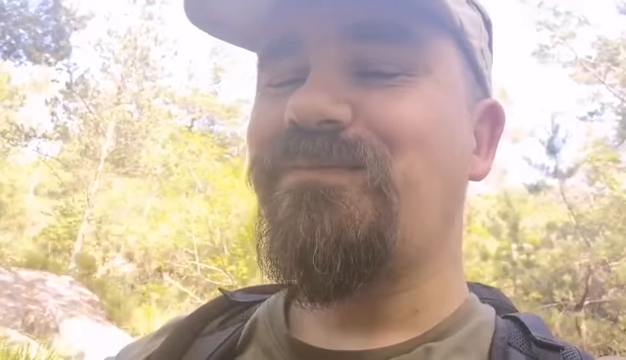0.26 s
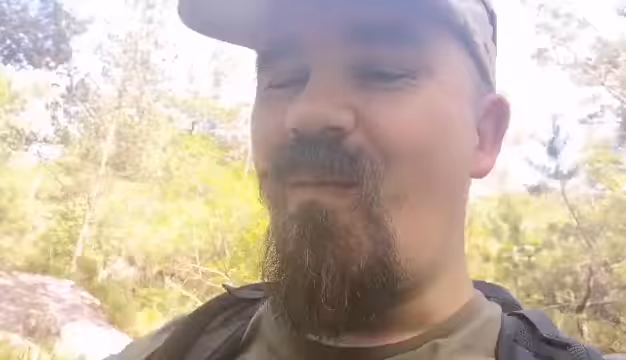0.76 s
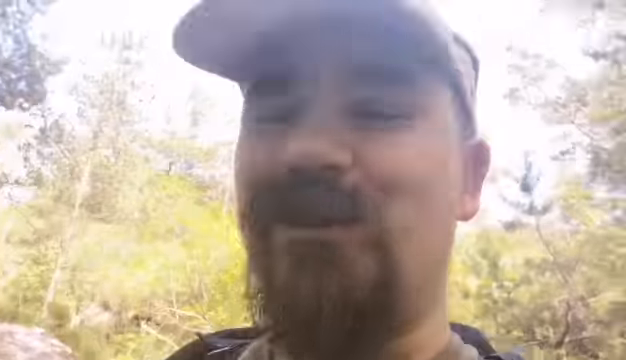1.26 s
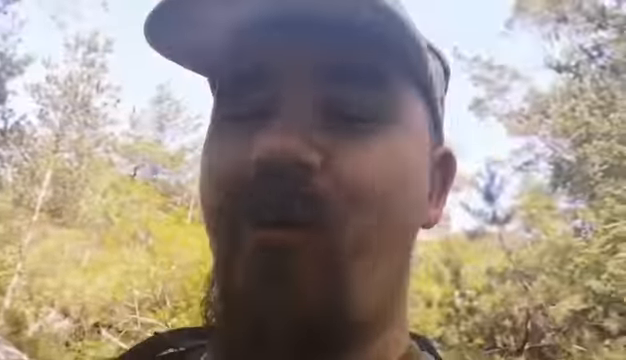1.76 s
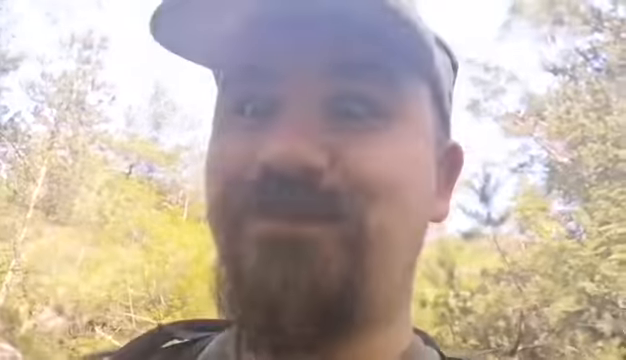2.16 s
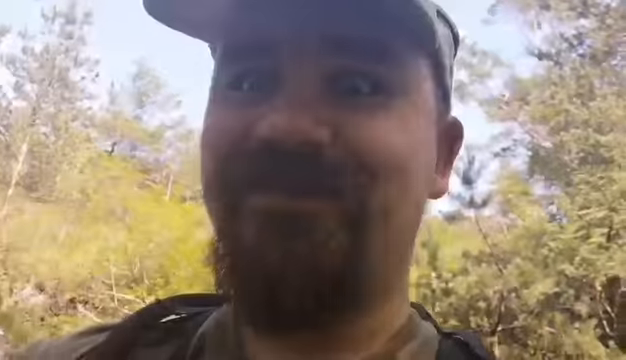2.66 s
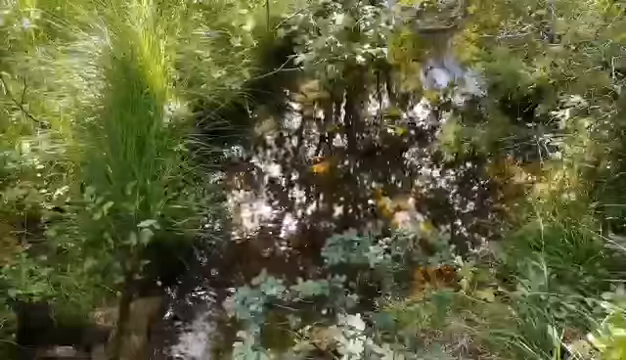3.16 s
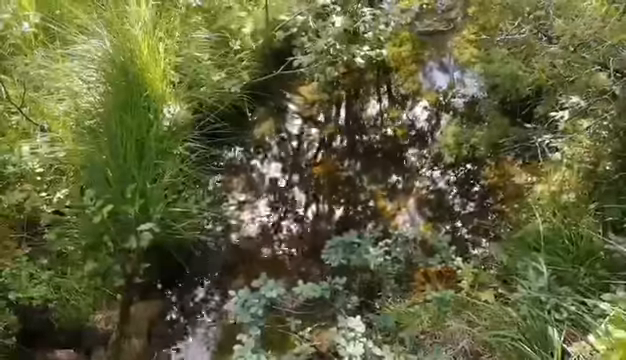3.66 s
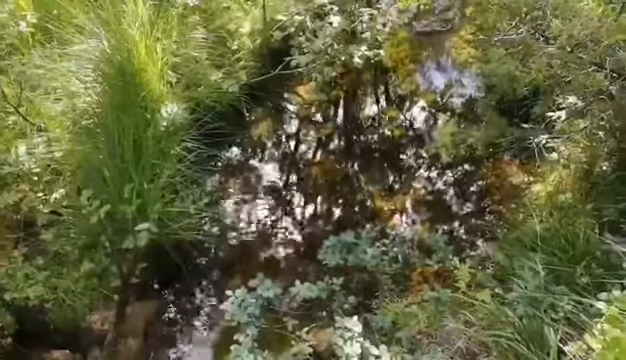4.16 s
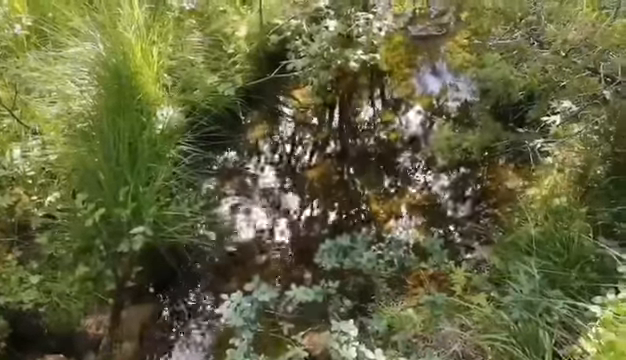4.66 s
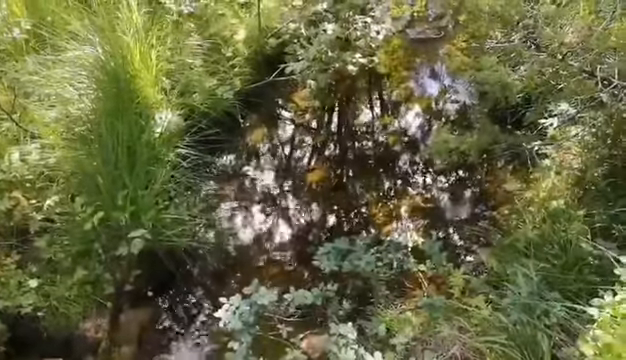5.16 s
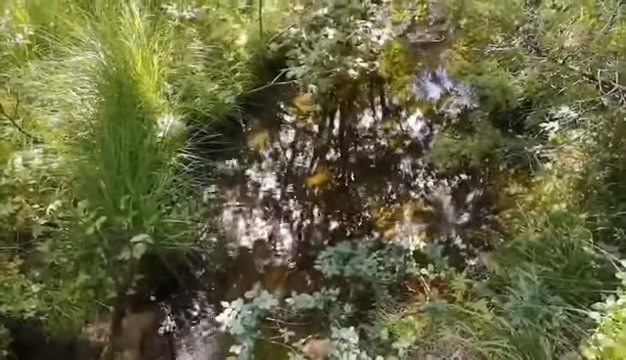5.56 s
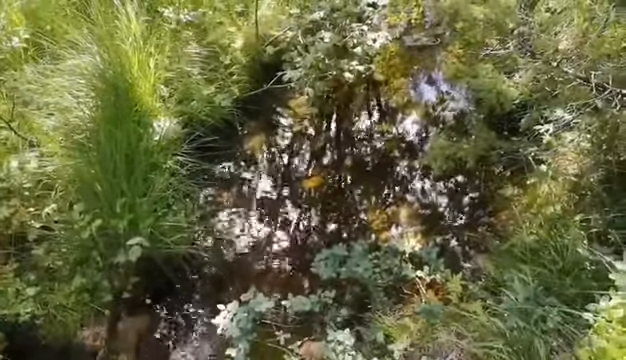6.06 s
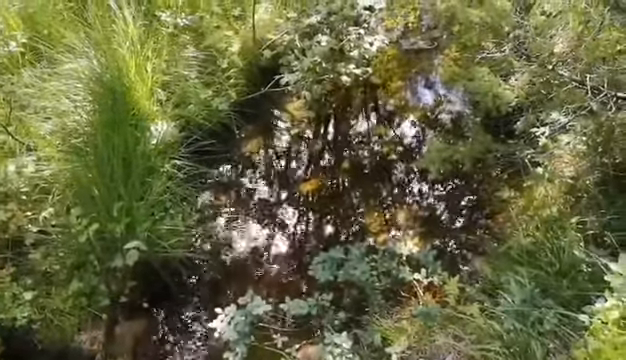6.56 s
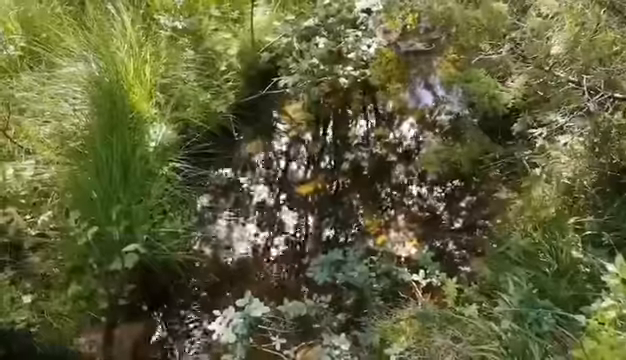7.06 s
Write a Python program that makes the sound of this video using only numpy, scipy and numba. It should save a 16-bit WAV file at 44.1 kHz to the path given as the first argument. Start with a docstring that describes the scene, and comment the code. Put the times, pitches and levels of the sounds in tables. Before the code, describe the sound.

A small brook gurgles over stones from the start, heard outdoors from a hand-held phone a few steps away. The water is a dense, steady bubbling with distinct little plops, light splashes and a fine hiss, over a faint low wind rumble. At about 1.6 seconds the water grows louder and shifts to the left. Between 1.7 and 2.3 seconds, fingers make several dull thumps on the phone and light gusts rumble on the microphone; one more soft thump comes just after 3 seconds. At 3.2 seconds everything cuts to silence. At 3.6 seconds the brook returns quietly and swells over about a second, now brighter and more to the right. It keeps gurgling, with scattered plops and small splashes, until the end at about 7.3 seconds.

```python
"""A brook gurgles over stones, a few steps from a hand-held phone. Water traps air bubbles that ring as
damped resonators, the smaller the higher; hollows under the stones glug. The hand turns, thumping the
case and bringing one microphone round to the water. The sound cuts out briefly, then fades in again
facing the brook. Light, gusty wind rumbles on the microphone ports over a low murmur."""
import sys
import numpy as np
from scipy import signal
from scipy.fft import rfft, irfft, next_fast_len
from scipy.io import wavfile
from scipy.ndimage import uniform_filter1d
from numba import njit

SR = 44100
rng = np.random.default_rng(int(sys.argv[2]) if len(sys.argv) > 2 else 0)


def bounce(signal):
    """Save signal as a 16-bit WAV file at the path given by the first command-line argument."""
    frames = np.transpose(np.atleast_2d(signal))
    limited = np.clip(frames, -1, 1)
    pcm = np.round(limited * 32767).astype(np.int16)
    wavfile.write(sys.argv[1], SR, pcm)


N = 322371

# audible spans on either side of the silent gap: (start [s], end [s])
SPANS = [(0, 3.194), (3.622, 7.31)]
# arrival delay at the left port: (before the gap [s], after the gap [s])
LEFT_LAG_S = [.00001, -0.000059]
GAP_START_S, GAP_END_S = SPANS[0][1], SPANS[1][0]
TIME = np.arange(N) / SR


def brook():
    """Superposition: three bubble populations share the same splashes; single bursts stand out."""
    # bubble spectra, large and small before and after the gap: (frequency [Hz], relative density [dB])
    large_spectra = [
        [(260, -45), (450, -35.5), (566, -17), (673, -28.5), (765, -16.5), (979, -8), (1160, -10), (1410, -4.5),
         (2000, 1), (4000, -11), (5200, -48.5)],
        [(260, -55), (450, -34.5), (555, -15), (667, -26), (997, -6.5), (1400, -1), (2150, -0.5), (2420, -0.5),
         (2800, -2), (4000, -10.5), (5200, -20.5), (8800, -120)],
    ]
    small_spectra = [
        [(2060, -18.5), (3500, -12), (4660, 7), (5800, 1.5), (6390, -16.5), (8000, -50.5), (10400, -63.5)],
        [(2060, -35), (3500, -15.5), (4380, -11.5), (5840, -2), (6660, -11), (8000, -25), (10400, -53.5)],
    ]
    spray_spectrum = [(4410, -3), (7500, -4), (8420, -9.5), (10700, -4), (13100, -11.5), (14500, -12),
                      (15500, -26)]
    # swell and sag of the flow: (time [s], large-bubble gain [dB], small-bubble gain [dB])
    surge = [(0, -3, -2), (1.0, -4.5, -5), (1.7, -1.5, -1.5), (2.0, 2, -6), (2.46, 0, -5), (2.65, 3.5, 2),
             (3.01, -1.5, -2.5), (3.08, 3, 1), (3.19, -1.5, -3), (4.84, -1.65, 0.5), (4.95, 1.5, 4),
             (5.1, -3.5, -5), (5.2, 1.5, 0), (5.34, -2, -0.5), (5.61, 1, -1.5), (6.1, -1, -1.4),
             (6.96, -2.5, -4), (7.31, 0, -3)]
    (large_db, small_db, spray_db, _, _), pans_db = orientation()
    times, large_surge, small_surge = np.transpose(surge)
    large_db = large_db + np.interp(TIME, times, large_surge) + fade_db()
    small_db = small_db + np.interp(TIME, times, small_surge) + fade_db()
    spray_db = spray_db + 0.99 * fade_db()
    splash = splashes(large_db)
    large = [bubbles(spectrum, splash, count=10000, cycles=42.2, scatter_db=11, stray=.35, trail_s=.009,
                     wide_db=5, wide_s=3e-5, far_db=-.5, steady=1.3, sharp=.15, alike_hz=2400,
                     rise=.077, glide=.11) for spectrum in large_spectra]
    small = [bubbles(spectrum, splash, count=8000, cycles=87, scatter_db=14.5, stray=.37, trail_s=.0092,
                     wide_db=3.5, wide_s=6e-5, far_db=-2.5, steady=1.2, sharp=.5, alike_hz=1500,
                     rise=.055, glide=.08) for spectrum in small_spectra]
    spray = bubbles(spray_spectrum, splash, count=10000, cycles=79, scatter_db=9.5, stray=.45,
                    trail_s=.0051, wide_db=.5, wide_s=1e-4, far_db=.5, steady=4, sharp=.7,
                    alike_hz=1500, rise=.07, glide=.06)
    before = TIME < GAP_START_S
    finest = signal.lfilter(*signal.butter(2, 11660, "high", fs=SR), spray)
    spray = spray + ~before * (undb(3) - 1) * finest  # brighter when facing the brook
    layers = np.where(before, *large), np.where(before, *small), spray
    levels_db = large_db, small_db, spray_db
    flow = sum(undb(db) * case_shadow(x, pan) for x, db, pan in zip(layers, levels_db, pans_db))
    return flow + plops(pans_db[0]) + glugs() + droplets()


def bubbles(spectrum, splash, count, cycles, scatter_db, stray, trail_s, wide_db, wide_s,
            far_db, steady, sharp, alike_hz, rise, glide, clump_db=3.5, clump_octaves=2.196):
    """Bubble resonance: most trail a splash, a share strays in between; far ones blur into hiss."""
    moment, pitch, pick, shallowness, kind, wait, strength = rng.random((count, 7)).T
    pan, bearing = rng.standard_normal((count, 2)).T
    splash_s, splash_db, wash, crack = splash
    parent = (pick * len(splash_s)).astype(int)
    trailing = kind > stray
    times = np.where(trailing, splash_s[parent] - trail_s * np.log(wait), moment * N / SR)
    hz = spectrum[0][0] * (spectrum[-1][0] / spectrum[0][0]) ** pitch
    # even spacing per octave and shorter high rings thin the energy per Hz as 1 / Hz^2: lift it back
    db = shape_db(spectrum, hz) + 20 * np.log10(hz) + scatter_db * strength
    favourite = rng.random(len(splash_s))[parent]  # each splash favours its own bubble sizes
    clump = np.cos(2 * np.pi * (np.log2(hz) / clump_octaves + favourite))
    db = db + trailing * (splash_db[parent] + clump_db * clump)
    lag = wide_s * bearing + np.where(times < GAP_START_S, *LEFT_LAG_S)
    # shallower bubbles ring more briefly and rise more in pitch
    t60 = cycles * 0.12 ** shallowness / hz
    near = tones(times, hz, t60, db, wide_db * pan, rise, glide * shallowness, lag)
    far = hiss(spectrum, alike_hz, flicker_db=2.7, rate_hz=12) * (steady + wash + sharp * crack)
    return unit(unit(near) + undb(far_db) * unit(far))


def splashes(flow_db, count=340, spread_db=1.98, strong_db=-16.5, wash_s=0.021, crack_s=0.0034):
    """Impulsive excitation: each slap of water starts a slow wash and a short crack envelope."""
    # strongest slaps over a stone: (time [s], level [dB]), taken relative to the running flow
    slaps = [(0.1244, -30), (1.645, -33.5), (1.6772, -36.5), (1.7952, -36), (1.96, -37), (2.3579, -30.5),
             (2.39, -30.5), (2.4363, -36), (2.5343, -30.5), (2.595, -21.5), (2.7307, -30.5),
             (2.8126, -28.5), (2.8612, -28), (2.898, -36), (3.084, -30.5), (3.1268, -29.5), (3.626, -50),
             (4.1053, -31), (4.31, -33), (4.4295, -32.5), (4.6197, -33), (4.8242, -22), (5.227, -32.5),
             (5.3881, -28), (5.5032, -23), (5.66, -36), (6.037, -31.5), (6.0856, -30), (6.12, -30),
             (6.2051, -25.5), (6.5558, -38), (6.733, -28), (6.83, -21.5), (6.9272, -36.5), (7.1241, -35),
             (7.2714, -26.5)]
    weak_s = (np.arange(count) + rng.random(count)) / count * N / SR
    weak_db = spread_db * rng.standard_normal(count)
    slap_s, slap_db = np.transpose(slaps)
    slap_db = slap_db - flow_db[(slap_s * SR).astype(int)] + strong_db
    times, db = np.r_[weak_s, slap_s], np.r_[weak_db, slap_db]
    kicks = np.bincount((times * SR).astype(int), undb(db), N)
    wash, crack = (unit(signal.lfilter([1], [1, -np.exp(-1 / (tau * SR))], kicks))
                   for tau in (wash_s, crack_s))
    return times, db, wash, crack


def plops(pan_db, follow_s=0.005, follow_db=-6.5):
    """Beating: a loud bubble opens with a click, then rings against a follower of nearby pitch."""
    # loudest single bubbles: (time [s], peak level [dB], pitch [Hz])
    bursts = [(0.065, -41, 2340), (0.134, -41, 2250), (0.174, -39.5, 2970), (0.233, -43, 3030),
              (0.307, -42, 2900), (0.378, -42, 3330), (0.398, -38.5, 2710), (0.784, -40, 2430),
              (0.959, -42.5, 1870), (0.967, -43, 767), (0.989, -33, 2420), (1.106, -46.5, 1370),
              (1.158, -41.5, 1490), (1.428, -48, 1060), (1.652, -40, 1580), (1.781, -47, 1020),
              (1.795, -36, 1880), (1.957, -33.5, 1980), (1.983, -36, 1970), (2.005, -41, 2000),
              (2.028, -35, 2050), (2.046, -35.5, 1630), (2.124, -45.5, 920), (2.127, -37, 1960),
              (2.138, -38.5, 4800), (2.274, -44, 4860), (2.346, -44, 3600), (2.359, -35, 2100),
              (2.363, -37, 1445), (2.393, -34, 2000), (2.437, -34, 4400), (2.52, -39.5, 4500),
              (2.534, -41, 1040), (2.571, -45, 1100), (2.593, -41.5, 966), (2.603, -40, 1010),
              (2.623, -40.5, 1000), (2.827, -44.5, 5640), (2.901, -32, 2430), (3.061, -37.5, 4840),
              (3.086, -35, 1920), (3.132, -39, 2200), (3.148, -37.5, 2330), (4.011, -43, 1830),
              (4.106, -40.5, 1860), (4.108, -39, 3560), (4.196, -40, 2790), (4.196, -44, 1255),
              (4.214, -49.5, 1145), (4.27, -47, 1980), (4.28, -37.5, 5660), (4.311, -38.5, 2000),
              (4.334, -38, 2010), (4.347, -43, 1340), (4.358, -40, 2980), (4.385, -40.5, 5700),
              (4.429, -39, 2650), (4.443, -41, 1410), (4.464, -39.5, 2010), (4.558, -49.5, 987),
              (4.567, -34.5, 2670), (4.618, -39.5, 2790), (4.769, -47.5, 996), (4.822, -36.5, 2090),
              (4.855, -39.5, 1530), (4.897, -40, 2080), (4.907, -41, 1460), (5.023, -40, 1420),
              (5.026, -41.5, 3750), (5.207, -46, 1080), (5.227, -32.5, 2760), (5.283, -41, 2820),
              (5.332, -45, 1360), (5.347, -39, 3570), (5.388, -38, 2200), (5.532, -38, 1820),
              (5.541, -39.5, 1250), (5.612, -48, 990), (5.661, -48, 995), (5.69, -33.5, 5650),
              (5.848, -39, 3180), (5.867, -37.5, 2940), (5.976, -41, 1210), (6.034, -39, 3280),
              (6.035, -35.5, 1466), (6.086, -36.5, 2100), (6.117, -38, 1400), (6.124, -29.5, 1430),
              (6.208, -40, 2600), (6.456, -35.5, 2180), (6.522, -37.5, 1800), (6.547, -46.5, 975),
              (6.555, -34.5, 3450), (6.604, -46.5, 933), (6.748, -42.5, 1255), (6.836, -35.5, 2220),
              (6.841, -46, 1760), (6.862, -45.5, 1005), (6.926, -43, 1240), (6.978, -40.5, 1370),
              (7.03, -36, 2480), (7.124, -39, 1820), (7.137, -39, 1810)]
    times, db, hz = np.transpose(bursts)[:, :, None]
    wait, strength, detune = rng.standard_normal((len(bursts), 2, 3)).transpose(2, 0, 1)
    follower = np.array([0, 1])
    times = (times + follower * follow_s * np.exp(0.44 * wait)).ravel()
    db = (db + follower * (follow_db + 1.8 * strength)).ravel()
    hz = (hz * np.exp(follower * (0.033 + 0.085 * detune))).ravel()
    t60 = 0.032 * (hz / 1000) ** -1.37  # smaller, higher bubbles die faster
    pan_db = pan_db[(times * SR).astype(int)] * np.minimum(hz / 1500, 1.6)  # the case shades highs more
    lag = np.where(times < GAP_START_S, *LEFT_LAG_S)
    clicks = tones(times[::2], 1.59 * hz[::2], 0.0013, db[::2] - 8.5, pan_db[::2],
                   rise=0.045, glide=0, lag=lag[::2])
    return clicks + tones(times, hz, t60, db, pan_db, rise=0.083, glide=0.033, lag=lag)


def glugs(count=200, t60=0.043, scatter_db=4.5):
    """Cavity resonance: air caught in hollows lets go in soft rising notes at random moments."""
    # hollows under the stones: (pitch [Hz], pitch spread [log ratio], typical peak level [dB])
    hollows = [(553, .07, -69), (798.5, .13, -65.5)]
    times = rng.random(count) * N / SR
    strength, detune, pan = rng.standard_normal((count, 3)).T
    hz, spread, db = np.array(hollows)[np.arange(count) % len(hollows)].T
    db = db + scatter_db * strength + fade_db()[(times * SR).astype(int)]
    return tones(times, hz * np.exp(spread * detune), t60, db, 3 * pan, rise=0.25, glide=0.11)


def droplets(t60=0.0018):
    """Heavy damping: a droplet's high ring dies so fast that it is heard as a tick."""
    # droplet ticks: (time [s], peak level [dB], pitch [Hz], left minus right [dB])
    ticks = [(0.123, -54, 10700, 14.0), (1.168, -45, 11400, 24), (2.136, -50, 7240, 10.5),
             (2.6286, -48, 10300, 17), (5.225, -49, 13400, -15.0), (5.9463, -51, 12700, -17)]
    times, db, hz, pan_db = np.transpose(ticks)
    return tones(times, hz, t60, db, pan_db, rise=0.1, glide=0.032)


def banks(x, wet_db=-7.5, t60=0.02, size=4096):
    """Diffuse scattering: stones, banks and moving water return the sound by ever-changing paths."""
    t = np.arange(size // 2) / SR
    wet = np.zeros((2, N + 3 * size))
    padded = np.pad(x, ((0, 0), (size, size)))
    window = np.sqrt(np.hanning(size))
    for i in range(0, N + size, size // 2):
        tail = rng.standard_normal((2, len(t))) * 1000 ** (-t / t60) * (t > .0015)
        tail = tail / np.sqrt(np.sum(tail ** 2, axis=1, keepdims=True))
        piece = padded[:, i:i + size]
        echo = signal.fftconvolve(piece * window[:piece.shape[1]], tail, axes=1)
        wet[:, i:i + echo.shape[1]] += echo
    return x + undb(wet_db) * wet[:, size:size + N]


def fingers():
    """Structure-borne sound: shifting fingers send dull thumps through the case."""
    # thumps: (time [s], peak level [dB], pitch [Hz], t60 [s], left minus right [dB])
    thumps = [(1.685, -45, 40, 0.096, 0), (1.783, -37.5, 88.8, 0.016, 7), (1.858, -33, 61.9, 0.017, 0),
              (1.925, -43.5, 90, 0.037, 0), (2.086, -36.5, 103, 0.089, 1), (2.146, -35.5, 96, 0.049, 2),
              (2.199, -31.5, 101, 0.054, 2.5), (2.26, -46.5, 290, 0.05, 0), (3.068, -35.5, 118, 0.054, 3)]
    times, db, hz, t60, pan_db = np.transpose(thumps)
    return tones(times, hz, t60, db, pan_db, rise=0.018, glide=-0.099, lag=-0.001)


def wind():
    """Turbulent pressure: the ports rumble, alike when calm and apart in gusts, over a low murmur."""
    # rumble and murmur spectra: (frequency [Hz], relative density [dB])
    rumble_spectrum = [(8.8, -12.5), (15, 6), (70, -5), (107, -10.5), (220, -16), (290, -38.5), (480, -120)]
    murmur_spectrum = [(200, -14.5), (250, 1.5), (350, 1.5), (470, -10)]
    # gust crests: (time [s], rumble level [dB], murmur level [dB])
    crests = [(1.78, -49, -60.5), (1.87, -52, -81), (2.06, -57, -71), (2.15, -57, -74), (2.65, -67, -61.5),
              (3.06, -57, -71.5), (5.2, -68, -71)]
    times, rumble_db, murmur_db = np.transpose(crests)
    calm_rumble_db, calm_murmur_db = orientation()[0][3:]
    gain = undb(calm_rumble_db) + gusts(times, rumble_db)
    left, right = hiss(rumble_spectrum, alike_hz=350, flicker_db=1.3, rate_hz=12) * gain
    apart = (gain / undb(calm_rumble_db)) ** 0.3 * (left - right) / 2
    rumble = (left + right) / 2 + np.array([apart, -apart])
    murmur = hiss(murmur_spectrum, alike_hz=280, flicker_db=0.85, rate_hz=2.9)
    murmur *= undb(calm_murmur_db) + gusts(times, murmur_db)
    return (rumble + murmur) * undb(fade_db())


def gusts(times, crest_db, rise_db_per_s=174, fall_db_per_s=77, hop=64):
    """Exponential growth and decay: the gain of each gust rises fast and falls more slowly."""
    since = TIME[::hop] - times[:, None]
    slope_db = np.where(since < 0, rise_db_per_s, -fall_db_per_s) * since
    return np.repeat(undb(crest_db[:, None] + slope_db).sum(axis=0), hop)[:N]


def orientation(turn_at_s=1.57, turn_s=0.25):
    """Directivity: the level and balance of each layer follow the way the phone points."""
    # rows: away from the brook, turned to it, facing it after the gap
    # (large, small, spray, rumble, murmur level [dB], large, small, spray left minus right [dB])
    holds = [(-50.5, -65.5, -71.5, -64, -79, -2, 4, 10.5), (-47, -58.5, -67.5, -61, -79, 8, 13.5, 10),
             (-48, -59, -69.5, -62, -77, -3, -10, -13.5)]
    away, turned, facing = np.array(holds)[:, :, None]
    turn = np.sin(np.pi / 2 * np.clip((TIME - turn_at_s) / turn_s, 0, 1)) ** 2
    held = np.where(TIME < GAP_START_S, away + turn * (turned - away), facing)
    return held[:5], held[5:]


def case_shadow(x, pan_db, knee_hz=700):
    """Diffraction: the case shades one port, but sound below the knee bends round it."""
    low = signal.lfilter(*signal.butter(1, knee_hz, fs=SR), x)
    return low + (x - low) * undb(np.array([pan_db, -pan_db]) / 2)


def fade_db(start_db=-14.5, tau_s=0.57):
    """Exponential relaxation: after the gap the level starts low and creeps up."""
    since = TIME - GAP_END_S
    return np.where(since > 0, start_db * np.exp(-np.abs(since) / tau_s), 0)


def tones(times, hz, t60, db, pan_db, rise, glide, lag=0):
    """Free vibration: damped tones whose envelopes peak at db, split between the ports by pan_db."""
    age = np.linspace(0, 1, 500)
    peak = np.max(1000 ** -age * (1 - np.exp(-age / rise)) ** 2)
    left, right = undb(db + pan_db / 2) / peak, undb(db - pan_db / 2) / peak
    each = np.ones(len(times))
    return ring(np.zeros((2, N)), times, hz, t60 * each, rise, glide * each, left, right, lag * each)


@njit
def ring(out, times, hz, t60, rise, glide, left, right, lag):
    """Damped oscillators: each swells over a share (rise) of t60 and glides by a share of its pitch."""
    for k in range(len(times)):
        start, n = int(times[k] * SR), int(t60[k] * SR) + 1
        swell = np.exp(-1 / (rise * t60[k] * SR))
        left_delay = np.exp(-2j * np.pi * hz[k] * lag[k])
        step = np.exp(2j * np.pi * hz[k] / SR - np.log(1000) / (t60[k] * SR))
        bend = np.exp(2j * np.pi * hz[k] * glide[k] / n / SR)
        phasor, onset = 1 + 0j, 1.
        for i in range(start, min(start + n, out.shape[1])):
            phasor, step, onset = phasor * step, step * bend, onset * swell
            out[0, i] += left[k] * (1 - onset) ** 2 * (phasor * left_delay).imag
            out[1, i] += right[k] * (1 - onset) ** 2 * phasor.imag
    return out


def hiss(spectrum, alike_hz, flicker_db, rate_hz):
    """Partial coherence: flickering half-octave noise bands, alike at both ports below alike_hz."""
    size = next_fast_len(N)
    f = np.maximum(np.fft.rfftfreq(size, 1 / SR), 1)
    noise = rfft(rng.standard_normal((2, size))) * undb(shape_db(spectrum, f))
    low_hz, high_hz = spectrum[0][0], spectrum[-1][0]
    out = 0
    for hz in low_hz * 2 ** np.arange(0, np.log2(high_hz / low_hz) + .5, .5):
        band = np.cos(np.pi * np.clip(np.log2(f / hz), -.5, .5)) ** 2
        mid, side = irfft(noise * band, size)[:, :N] * undb(flicker_db * flicker(rate_hz))
        alike = 1 / (1 + (hz / alike_hz) ** 2)
        out = out + np.sqrt(1 + alike) * mid + np.sqrt(1 - alike) * np.array([side, -side])
    return unit(out)


def flicker(rate_hz):
    """Random modulation: held steps, smoothed twice, at unit RMS."""
    hold = int(SR / rate_hz)
    steps = np.repeat(rng.standard_normal(N // hold + 1), hold)
    return unit(uniform_filter1d(uniform_filter1d(steps, hold), hold)[:N])


def shape_db(spectrum, hz):
    """Spectral envelope, interpolated over log frequency."""
    f, db = np.transpose(spectrum)
    return np.interp(np.log(hz), np.log(f), db, left=-90, right=-90)


def undb(db):
    """Level to amplitude ratio."""
    return 10 ** (np.asarray(db) / 20)


def unit(x):
    """Normalisation to unit RMS."""
    return x / np.sqrt(np.mean(x ** 2))


def scene():
    """Superposition of water, handling and wind, gated to silence in the gap."""
    audible = sum((TIME >= start) & (TIME < end) for start, end in SPANS)
    return (banks(brook()) + fingers() + wind()) * uniform_filter1d(1. * audible, size=60)


def record(dry):
    """Band limiting: the phone cuts the top of the treble."""
    return signal.sosfilt(signal.ellip(8, .2, 70, 15400, fs=SR, output="sos"), dry)


dry = scene()
out = record(dry)
bounce(out)
```